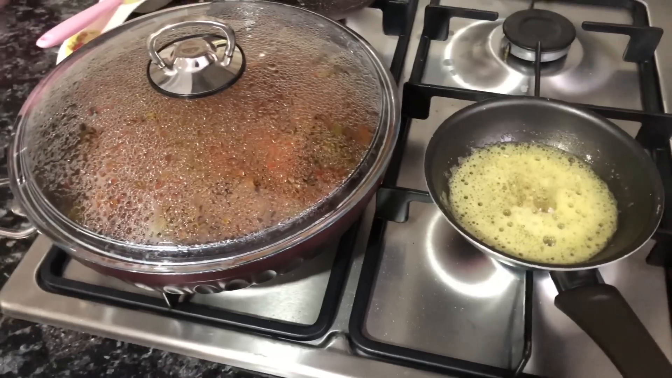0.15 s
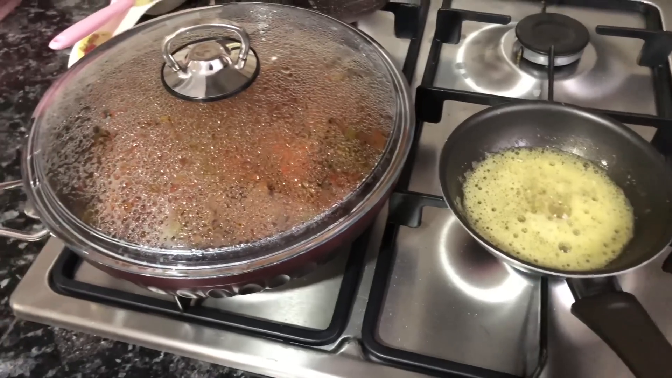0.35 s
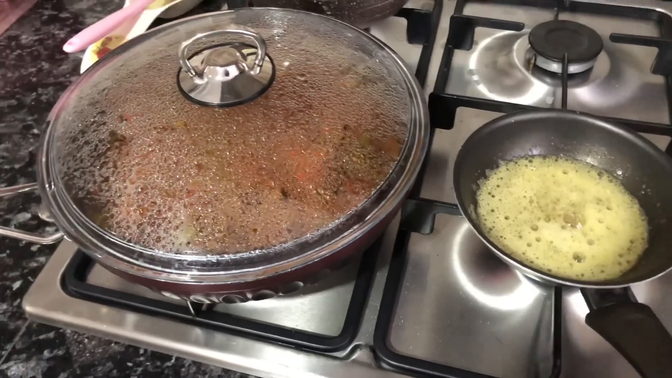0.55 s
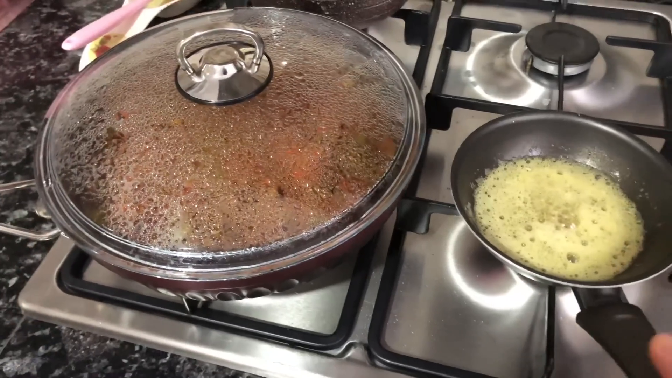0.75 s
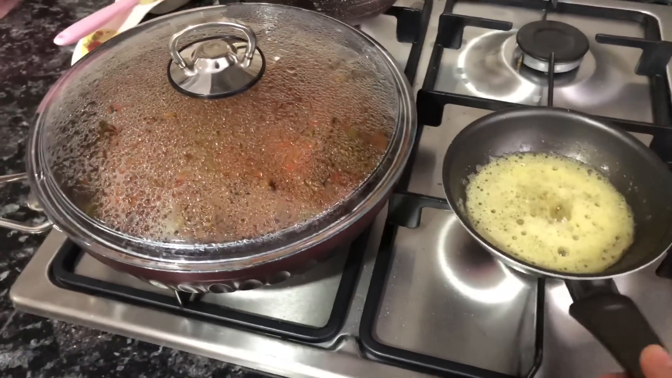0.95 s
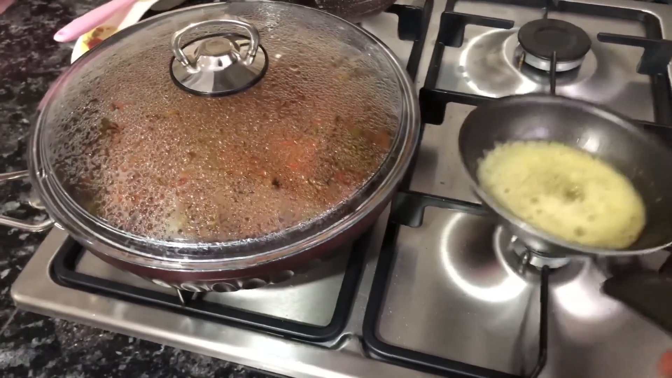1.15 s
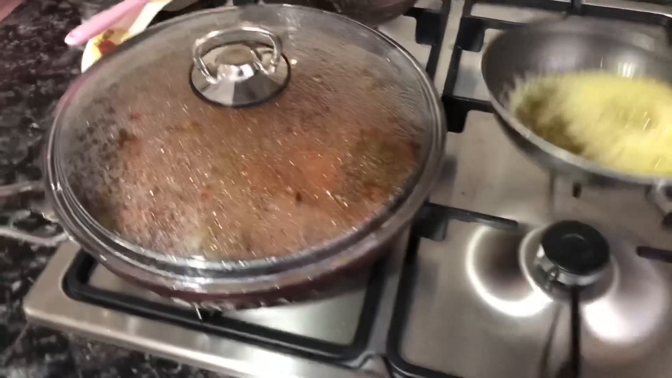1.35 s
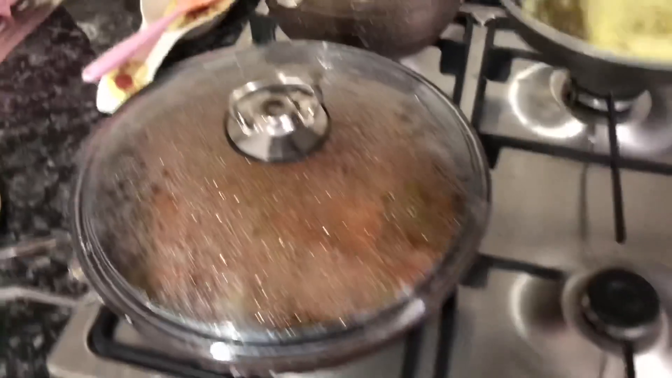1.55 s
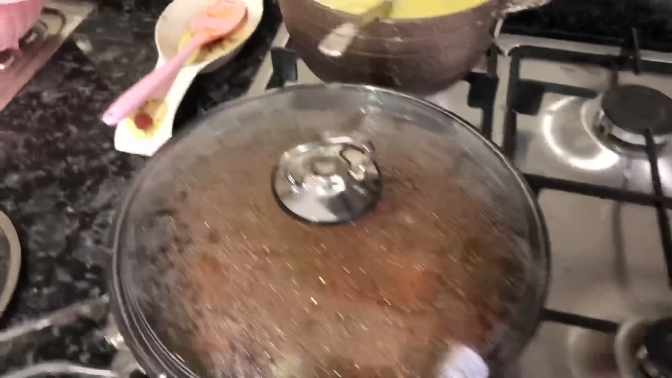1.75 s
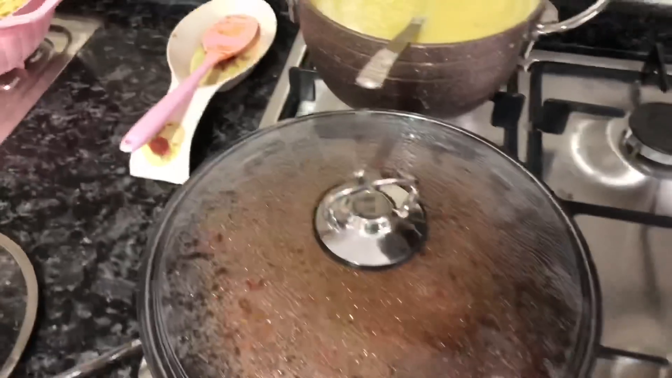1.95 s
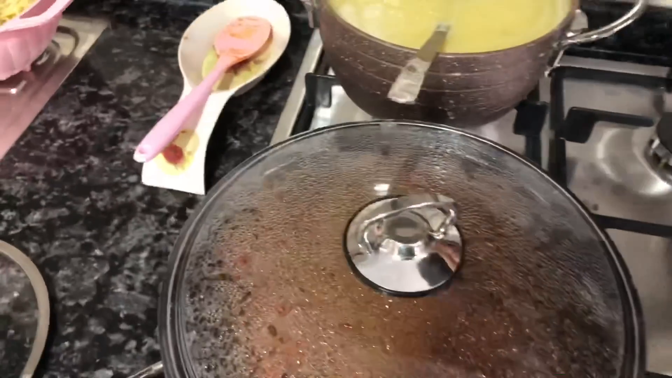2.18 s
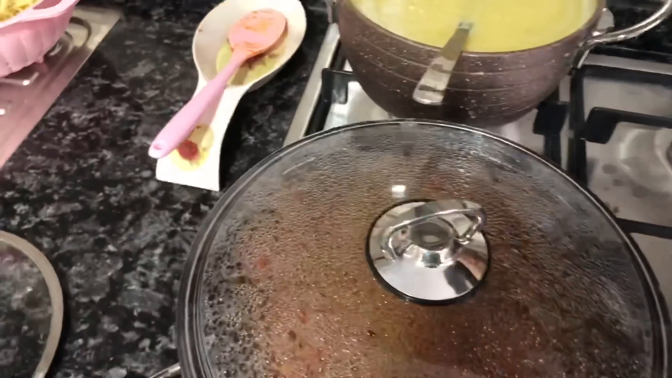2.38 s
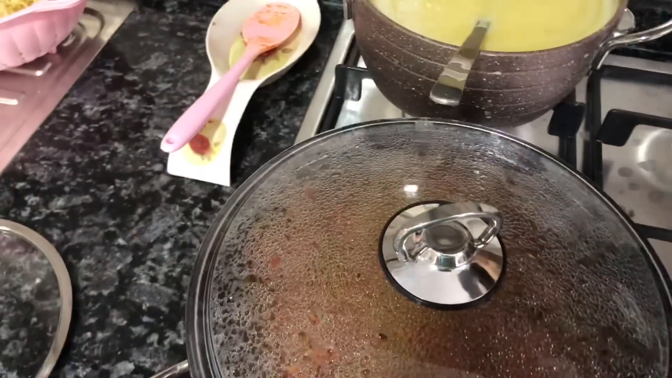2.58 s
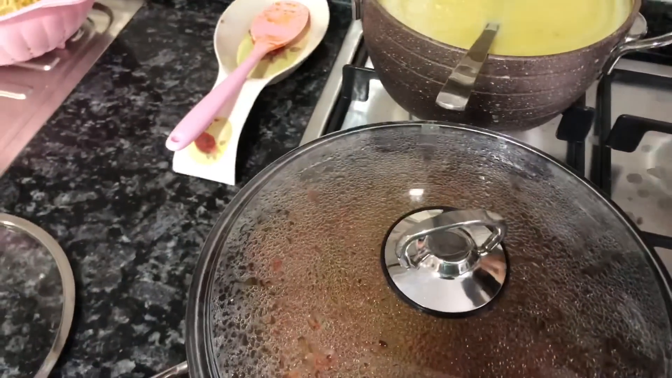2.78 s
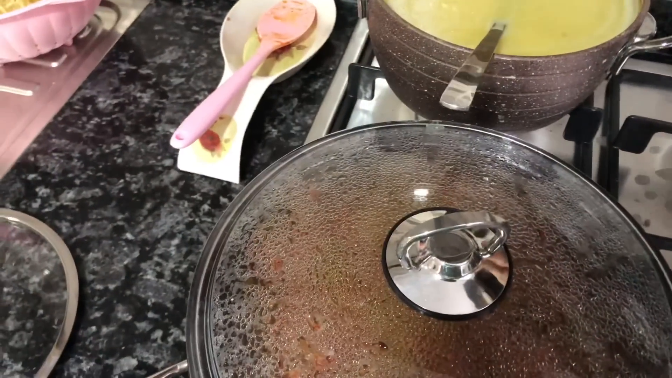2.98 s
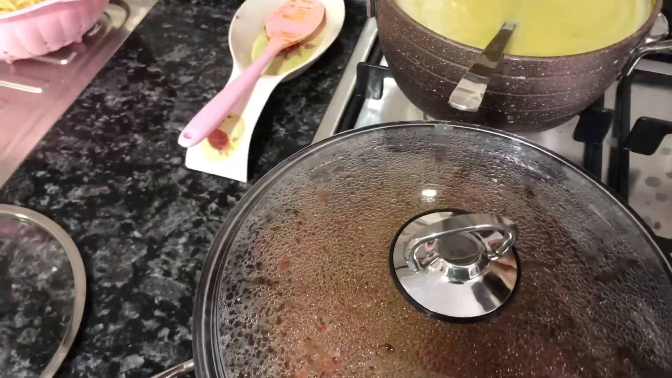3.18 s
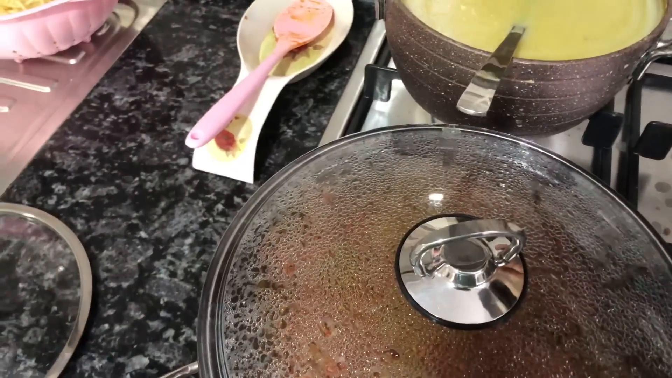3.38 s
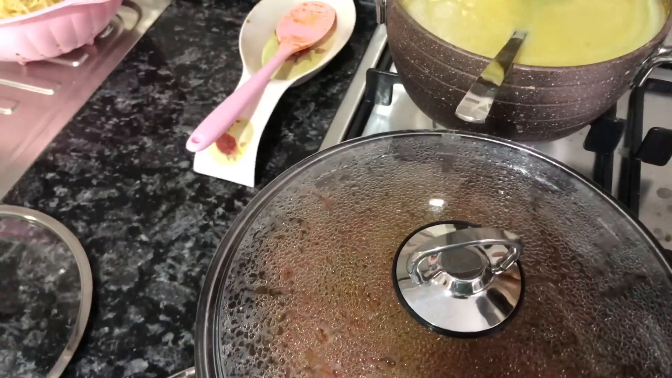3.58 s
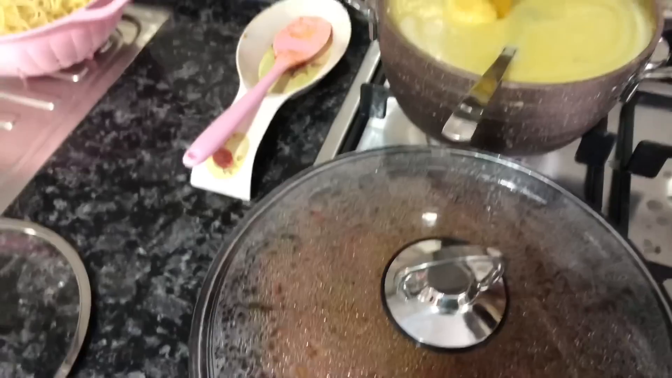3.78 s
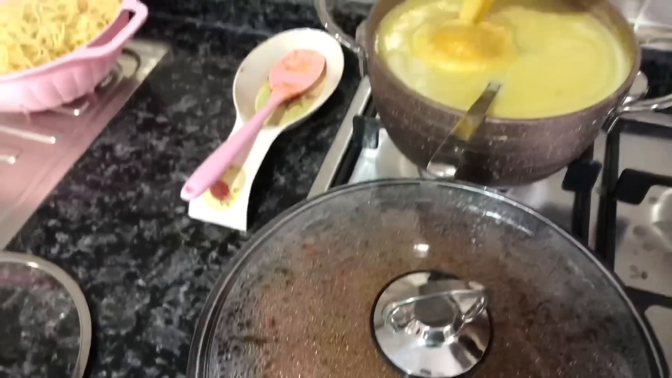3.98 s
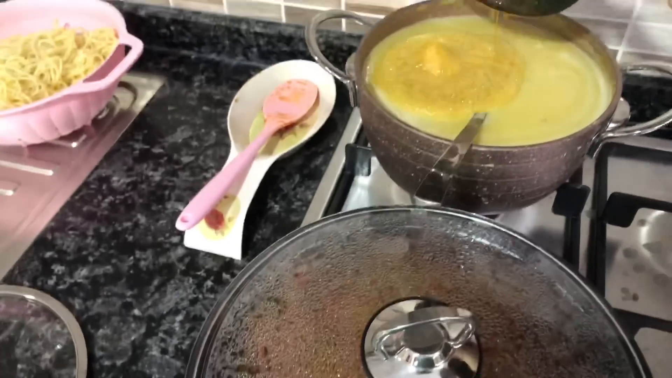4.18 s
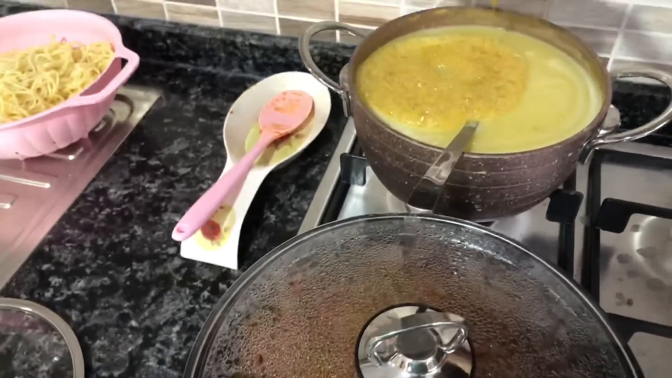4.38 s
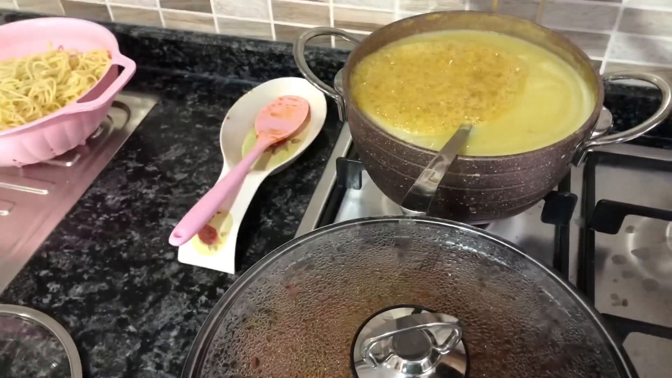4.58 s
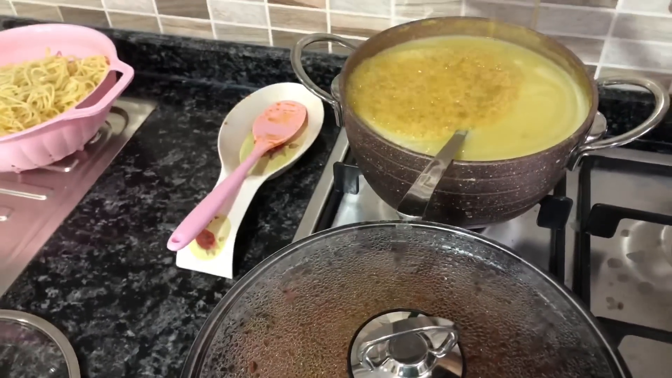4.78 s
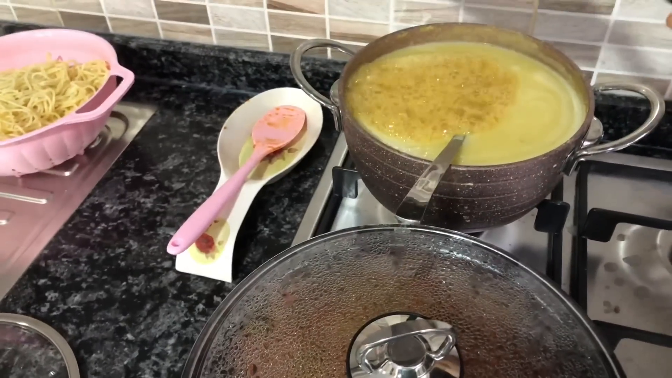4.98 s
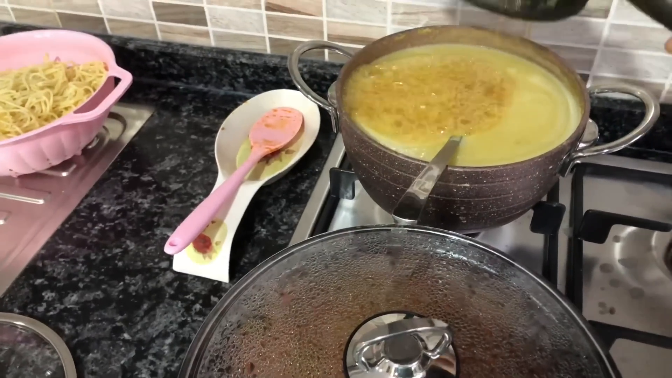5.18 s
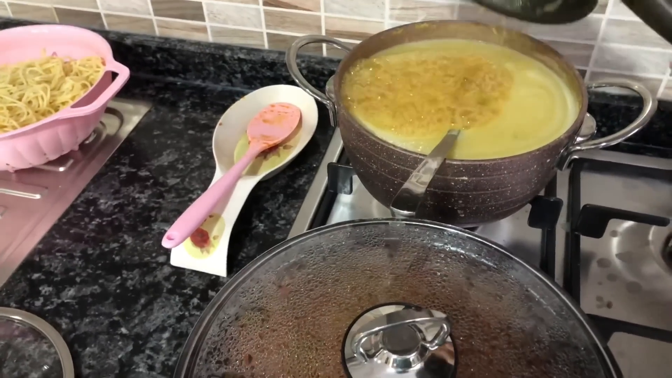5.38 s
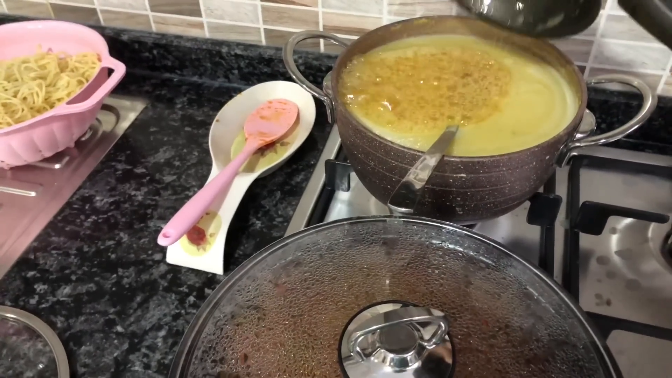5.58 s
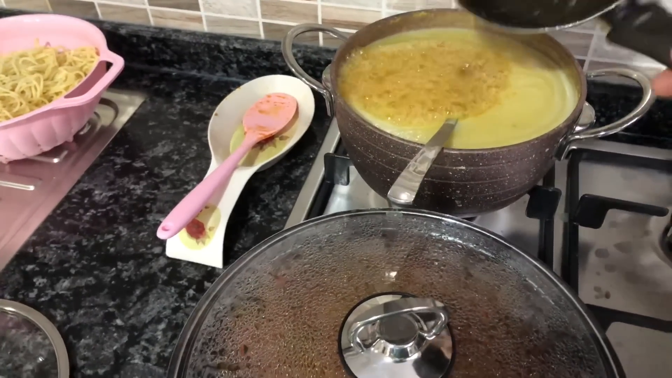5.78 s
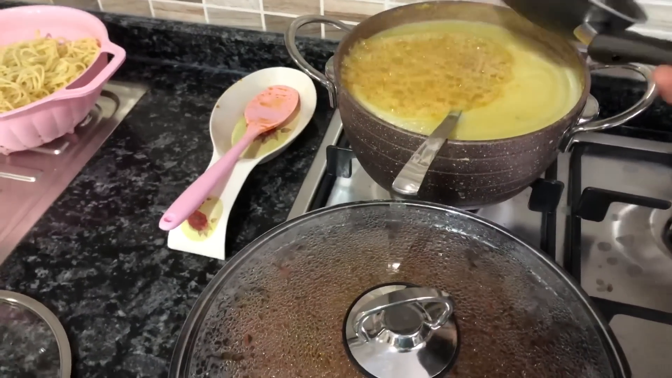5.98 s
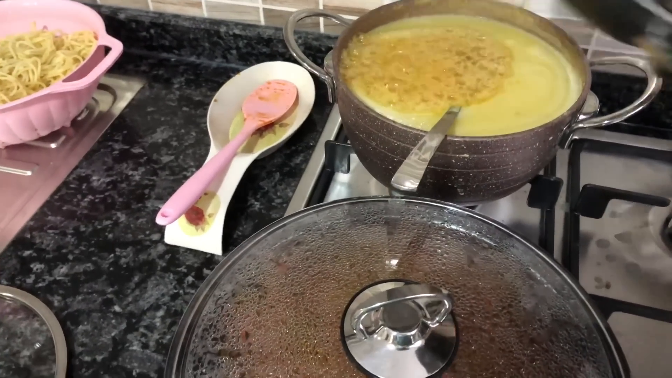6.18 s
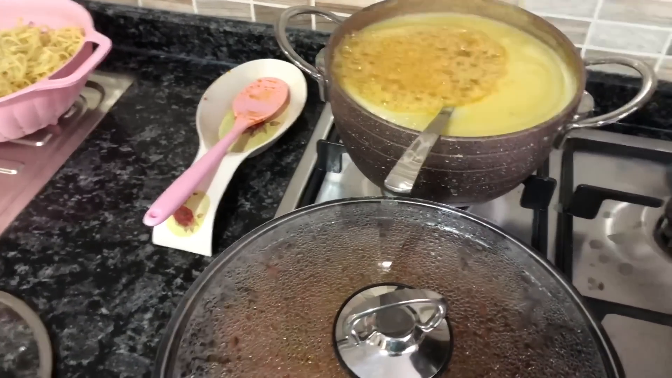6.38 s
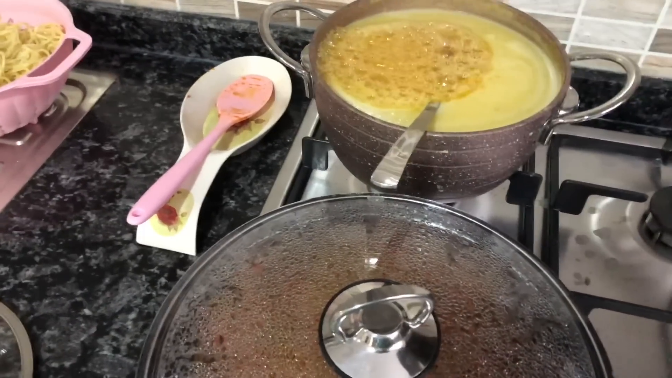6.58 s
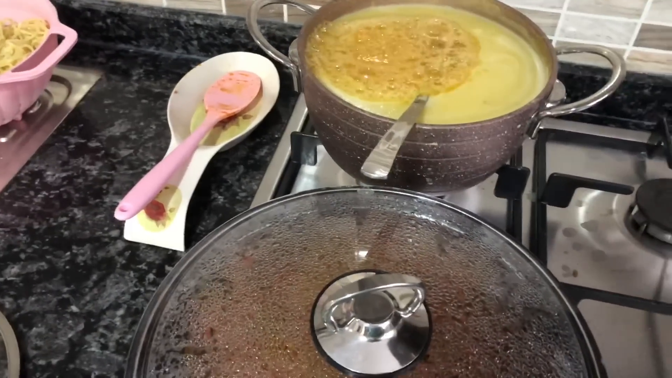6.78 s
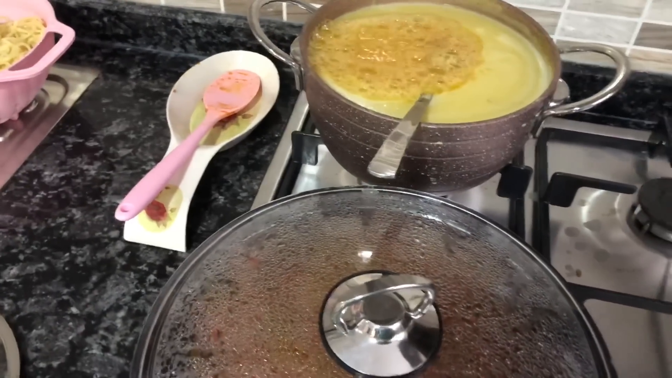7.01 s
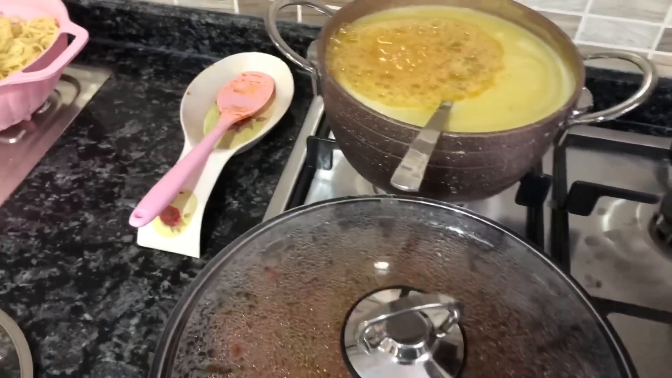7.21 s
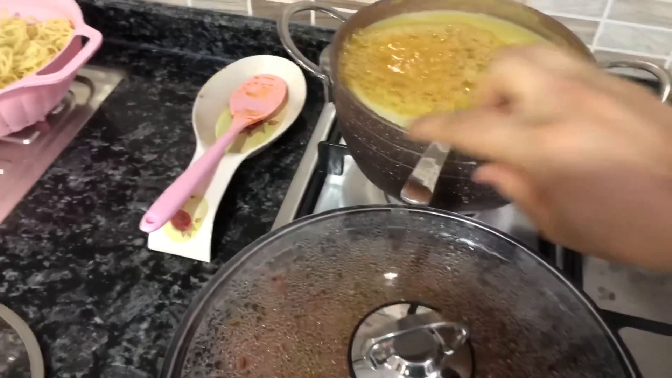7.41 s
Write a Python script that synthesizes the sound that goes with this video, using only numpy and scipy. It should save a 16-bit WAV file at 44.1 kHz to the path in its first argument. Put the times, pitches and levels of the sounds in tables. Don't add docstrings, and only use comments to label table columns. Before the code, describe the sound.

Close recording at a home stove: quiet motor hum, rumble and soft rustling under isolated bubbly pops. A pan drags and knocks on cast iron. Seconds later, hot fat poured into soup bursts into a violent bright sizzle, harsh and clipped, then breaks into wet snapping pops. The empty pan lands with a short ringing clang, rocks slightly, and a few pops linger.

```python
import sys
import numpy as np
from scipy import signal
from scipy.fft import rfft, irfft, next_fast_len
from scipy.io import wavfile

SR = 44100
rng = np.random.default_rng(int(sys.argv[2]) if len(sys.argv) > 2 else 0)


def inscribe(sig):
    pcm = np.round(np.clip(np.atleast_2d(sig).T, -1, 1) * 32767)
    wavfile.write(sys.argv[1], SR, pcm.astype(np.int16))


def invert_db(x):
    u = np.asarray(x, float) / 20
    return 10 ** u


N = 328545
TIME_S = np.arange(N) / SR

# start_s, level_db
BOIL_VIGOUR = [
    (3.4, -43),
    (3.55, -39),
    (3.64, -25.5),
    (3.88, -10.5),
    (4.12, -7.5),
    (4.45, -12),
    (5.4, -31),
    (6, -41),
    (7.45, -54.5),
]
# pitch_hz, level_db, t60_s
KNOCKED_SUPPORT = [(1000, -5, 0.24), (1180, -4, 0.22), (1360, -7, 0.24), (1806, -7, 0.054),
                   (2280, 10, 0.023), (3800, -3, 0.041), (5600, -5, 0.045)]
BUMP_S = .7135


def rms_one(x):
    return x / np.sqrt(np.mean(x ** 2) + 1e-20)


def curve(rows):
    return np.interp(TIME_S, *np.transpose(rows))


def filtered(x, order, hz, kind):
    return signal.sosfilt(signal.butter(order, hz, kind, fs=SR, output="sos"), x)


def drift(rate):
    r = np.exp(-80 * np.pi * rate / SR)
    slow = signal.lfilter([1], [1, -2 * r, r * r], rng.standard_normal(N // 40 + 2002))[2000:]
    return np.interp(np.arange(N) / 40, np.arange(len(slow)), rms_one(slow))


def ring(clicks, hz, t60):
    r = invert_db(-60 / (t60 * SR))
    w = 2 * np.pi * min(hz, 18000) / SR
    return signal.lfilter([0, np.sin(w)], [1, -2 * r * np.cos(w), r * r], clicks + 1e-18)


def colour(x, spectrum):
    size = next_fast_len(N)
    hz, db = np.transpose(spectrum)
    bins_hz = np.arange(size // 2 + 1) * SR / size
    gain = invert_db(np.interp(np.log(bins_hz + 1), np.log(hz), db, -90, -90))
    return rms_one(irfft(rfft(x, size) * gain, size)[:N])


def decay_noise(t60, seconds):
    t = np.arange(int(seconds * SR)) / SR
    puff = rng.standard_normal(len(t)) * invert_db(-60 * t / t60)
    return puff / np.sqrt(np.sum(puff ** 2))


def crackle(per_s, spread_db, pitches_hz, cycles):
    sizes = invert_db(spread_db * np.minimum(rng.exponential(1, N), 4)) * rng.choice([-1, 1], N)
    born = rng.random(N) < per_s * invert_db(2.2 * drift(9)) / SR
    dealt = rng.integers(0, len(pitches_hz), N)
    rings = sum(ring(sizes * born * (dealt == k), hz, cycles / hz) for k, hz in enumerate(pitches_hz))
    return rms_one(rings / np.sqrt(per_s))


def room_tone():
    # start_s, level_db
    movement = [(0, -50.5), (1.3, -54.5), (1.4, -46.5), (1.55, -50), (1.77, -48), (1.9, -52.5),
                (3.2, -54.5), (3.45, -49)]
    # start_s, level_db
    low_swell = [(0.0, -47.5), (4.79, -45), (7.45, -43.5)]
    # pitch_hz, level_db, waver_db
    overtones = [(50.5, -8.5, 7), (66, 0.5, 1), (97.4, -4, 2.5), (135.4, -10, 2.5), (184, -8, 2.5),
                 (232, -11, 0.5)]
    # pitch_hz, level_db per Hz
    rumble_spectrum = [(35, -36), (45, -5), (80, -16), (150, -13), (300, -12), (400, -17.5), (600, -32)]
    rustle_spectrum = [(210, -25), (350, 1.5), (1420, -4.5), (1820, -7.5), (2000, -6.5), (3030, -11.5),
                       (3500, -12), (4550, -11), (7700, -120)]
    foam_spectrum = [(1470, -11), (2500, -8.5), (5770, 8.5), (9980, 2), (12200, 2), (15100, 1), (16200, -8)]
    rustle_db = curve(movement)
    foam_db = -55.5 + .6 * (rustle_db - rustle_db.mean())
    white = rng.standard_normal((3, N))
    hum = 0
    for hz, db, waver in overtones:
        phase = 2 * np.pi * hz * TIME_S + 0.57 * waver * drift(6.9)
        hum = hum + invert_db(db + waver * drift(8.9)) * np.sin(phase)
    low = invert_db(curve(low_swell)) * (invert_db(-4.5) * colour(white[0], rumble_spectrum) + hum)
    foam = white[1] + .8 * crackle(150, 3, np.geomspace(2500, 14000, 8), 6)
    patches = invert_db(2.5 * drift(4))
    rustle = invert_db(rustle_db + 1.25 * drift(2.8)) * colour(white[2], rustle_spectrum)
    return low + invert_db(foam_db) * patches * colour(foam, foam_spectrum) + rustle


def thumps():
    # start_s, pitch_hz, level_db, t60_s
    blows = [
        (.56, 55, -34, .3),
        (.73, 58, -30, .3),
        (.722, 255, -15, .14),
        (.89, 52, -38, .25),
        (6.485, 160, -24, .25),
        (6.74, 150, -29, .3),
    ]
    low = 0
    for s, hz, db, t60 in blows:
        since = TIME_S - s
        swell = invert_db(db - 60 * np.abs(since) / t60) * np.clip(since / .015, 0, 1)
        low = low + swell * np.sin(2 * np.pi * hz * since)
    knock = (np.arange(N) == round(BUMP_S * SR)) * invert_db(-18)
    return low + sum(invert_db(db) * ring(knock, hz, t60 * .3) for hz, db, t60 in KNOCKED_SUPPORT)


def stroke(start, attack, hold, peak_db, release_db):
    t = TIME_S - start
    late = np.maximum(t - attack - hold, 0)
    fall = invert_db(-release_db * late) + invert_db(-17 - 160 * late)
    return invert_db(peak_db) * np.clip(t / attack, 0, 1) ** 2 * fall


def scuffs():
    # start_s, attack_s, hold_s, peak_db, release_db_per_s
    rubs = [
        (.515, .03, .01, -49, 500),
        (.724, .006, .012, -34, 600),
        (.853, .006, .018, -48, 900),
    ]
    grit = rng.standard_normal(N) * (rng.random(N) < 9000 / SR)
    bright = rms_one(filtered(grit, 2, [2500, 15500], "band"))
    return sum(stroke(*row) for row in rubs) * bright


def rubbing(strokes, modes, damping, grit_db, soft_hz):
    catches = rng.standard_normal(N) * (rng.random(N) < 2500 / SR)
    catches = filtered(catches, 2, soft_hz, "low")
    body = rms_one(sum(invert_db(db) * ring(catches, hz, t60 * damping) for hz, db, t60 in modes))
    grit = rms_one(filtered(catches, 2, [350, 2500], "band"))
    return sum(stroke(*row) for row in strokes) * (body + invert_db(grit_db) * grit)


def pan_on_support():
    # pitch_hz, level_db, t60_s
    grating = [(157, -14, 0.24), (329, 1.5, 0.12), (548, -6, 0.048), (856, -7, 0.019), (1280, -19, 0.03)]
    dragged = [(343, -19, 2), (547, 2, 0.53), (662, 4, 0.27), (1320, -2, 0.44), (2160, -20, 0.16),
               (3120, -10, 0.13), (3790, -14, 0.28)]
    # start s, attack s, hold s, peak dB, release dB per s
    nudge, shift = (0.0, .05, .025, -32, 600), (7.33, .09, .04, -27.5, 500)
    drag, settle = (.508, .014, .05, -29, 330), (6.712, .01, .002, -29, 450)
    thud, bump = (.722, .015, .01, -18.5, 400), (BUMP_S, .001, .015, -24, 350)
    tilt, swing = (1.02, .008, .015, -48, 400), (1.42, .006, .02, -47, 400)
    metal = rubbing([nudge, shift], grating, 0.9, -22, 1500)
    metal = metal + rubbing([drag, settle], dragged, 0.11, -14, 2300)
    metal = metal + rubbing([thud], grating, 0.43, -23, 3000)
    metal = metal + rubbing([bump], KNOCKED_SUPPORT, 0.23, -1.3, 5000)
    return metal + rubbing([tilt, swing], KNOCKED_SUPPORT, 0.2, -15, 1000)


def clang():
    # start_s, level_db
    contacts = [
        (6.4815, 0),
        (6.536, -26),
        (6.694, -44),
    ]
    # pitch_hz, level_db, t60_s
    pan_modes = [(315, -12.5, 0.1), (525, -20, 0.11), (1120, -12, 0.12), (1486, -17, .3), (1580, -11, 0.32),
                 (1603, 17.5, 0.058), (2317, -15, 0.068), (3088, -19, 0.4), (3120, -5.5, 0.27),
                 (3560, -7, 0.033), (4930, -18, 0.12), (6110, -30, 0.15), (7560, -27, 0.12)]
    clicks = np.zeros(N)
    for s, db in contacts:
        clicks[round(s * SR)] = invert_db(db)
    flutter = invert_db(2 * np.array([drift(60), drift(60), drift(60)]))
    rings = 0
    for k, (hz, db, t60) in enumerate(pan_modes):
        rings = rings + (-1) ** k * invert_db(db) * flutter[k % 3] * ring(clicks, hz, t60)
    crack = signal.fftconvolve(clicks, decay_noise(.028, .08))[:N]
    return rings + invert_db(37) * filtered(crack, 2, [1900, 3000], "band")


def skillet_ring(drops):
    lifted_s, t60_s = .7, .04
    resting = drops * (TIME_S < lifted_s)
    return invert_db(-38) * sum(ring(resting, hz, t60_s) for hz in [1350, 2000, 2600, 3650, 5250])


def drops_table():
    # start_s,
    # cavity_hz, cavity_db, snap_db
    spits_and_drips = [(.0512, 2560, -26.5, -49), (.0583, 2540, -26, -38.5), (.1011, 2300, -23, -24.5),
                       (.1372, 8480, -38, -34), (.2159, 2710, -27.5, -58), (.2238, 2730, -35, -48),
                       (.2893, 2830, -19.5, -24.5), (.3599, 2230, -34, -51), (.4014, 2580, -29, -33),
                       (.4508, 2600, -28, -33), (.4537, 2270, -30, -34.5), (.5449, 3300, -22, -35),
                       (.582, 9000, -40, -33), (.6209, 2870, -29, -52), (.6658, 6680, -47, -30),
                       (.6995, 2280, -23, -43), (.9224, 3230, -38, -41), (.9692, 7460, -18, -26),
                       (1.0714, 4100, -23, -53), (1.1583, 7400, -16.5, -21.5), (1.3658, 1300, -33, -42),
                       (1.4297, 8480, -31, -27.5), (1.454, 4400, -25, -40), (1.5098, 6900, -20, -35),
                       (1.593, 4440, -26, -49), (1.629, 3790, -37, -52), (1.6599, 5500, -31, -49),
                       (1.9152, 4050, -37, -54), (2.0079, 6070, -42, -26), (2.0723, 5650, -20.5, -25),
                       (2.1732, 3300, -14, -32), (2.215, 5160, -17.5, -37), (2.3159, 8200, -27.5, -34),
             (2.4605, 4900, -23.5, -26), (2.5204, 4120, -29.5, -48), (2.5488, 2350, -32, -35),
             (2.6122, 5860, -20, -26), (2.6222, 5120, -16, -18), (2.6957, 5150, -27, -17),
             (2.7476, 7800, -30, -40.5), (2.766, 6680, -20, -29), (2.78, 6200, -21, -28.5),
             (2.8125, 6040, -8.5, -11.5), (2.9864, 3270, -38.5, -46), (3.066, 4220, -39, -33.5),
             (3.1383, 4010, -23.5, -26), (3.207, 4800, -21.5, -28), (3.2118, 4330, -22, -41),
             (3.3039, 3880, -15, -27.5), (3.3567, 4700, -8.5, -33.5), (3.4254, 3500, -3.5, -21),
             (3.4356, 3060, -19, -43), (3.4853, 5210, -14, -46), (3.4952, 3800, -5, -29.5),
             (3.546, 5200, -10, -36), (3.5624, 5170, -16, -23.5), (3.6077, 2650, -12, -20.5),
             (3.6463, 7360, 1, -7.5), (3.7082, 4610, .5, -20)]
    lone_pops = [(5.6916, 6800, -6, -11), (5.7517, 2240, -12, -38), (5.7637, 5560, -8, -30),
                 (5.7887, 4350, -14, -16), (5.827, 4180, -11, -35), (5.8812, 3920, -6, -38),
                 (5.9234, 7670, -17, -28), (5.9977, 4820, -11, -23), (6.0483, 7280, -11, -23),
                 (6.6492, 8480, -19, -26), (6.1293, 6720, -21, -26), (6.1533, 3000, -7, -23),
                 (6.1844, 5600, -11, -38), (6.2009, 6550, -14, -17), (6.2143, 6500, -7, -9),
                 (6.2528, 7280, -16, -8), (6.2721, 3450, -12, -37), (6.3281, 6850, -15, -34),
                 (6.548, 7000, -17, -28), (6.4186, 3960, -25, -34), (6.6937, 1300, -36, -24),
                 (6.7195, 4740, -10, -32), (6.7438, 6290, -20, -25), (6.7721, 6980, -19, -16),
                 (6.8533, 5680, -18, -30), (6.9732, 6590, -10, -11), (7.0134, 4500, -8, -22),
                 (7.1395, 5900, -13, -24), (7.154, 6760, -21, -25), (7.1816, 5730, -16, -38)]
    # start_s, cavity_db, cavity_hz
    loud_bursts = [(4.7028, 0, 4510), (4.7173, 0, 6490), (4.7407, 0, 4840), (4.7617, 1, 4750),
                   (4.7901, 1, 4760), (4.8221, -3, 4800), (4.8295, -2, 6260), (4.846, 0, 4180),
                   (4.8734, 0, 4790), (4.8854, -2, 5730), (4.9233, -2, 4860), (4.9463, -1, 4180),
                   (5.0565, 0, 5940), (5.1099, -3, 4690), (5.1284, -5, 4660), (5.1543, -4, 6160),
                   (5.1653, 0, 4730), (5.2461, -3, 6390), (5.2915, -5, 4660), (5.3369, -4, 5770),
                   (5.3568, -6, 4820), (5.3748, -5, 4780), (5.4057, -6, 5910), (5.4746, -6, 6980),
                   (5.5135, -31, 8500), (5.5135, -6, 5350), (5.5379, -11, 8240), (5.5863, -5, 3550),
                   (5.6292, -10, 4230), (5.6537, -12, 5420)]
    chance = rng.standard_normal((200, 4))
    when = rng.uniform(4.95, 6.2, size=60)
    level_db = 3.5 + .55 * np.interp(when, *np.transpose(BOIL_VIGOUR)) + 2.5 * chance[:len(when), 2]
    pitch_hz = 5800 * np.exp(.22 * chance[:len(when), 3])
    loose = loud_bursts + list(zip(when, level_db, pitch_hz))
    bursts = [(s, hz, db - 2.5, db - 16 + 4 * c) for (s, db, hz), c in zip(loose, chance[:, 0])]
    rows = np.array(spits_and_drips + lone_pops + bursts)
    start_s, hz, cavity_db = rows[:, 0], rows[:, 1], rows[:, 2]
    plop_db = cavity_db - 19.5 - 15 * np.log2(hz / 2500) + 2.0 * chance[:len(rows), 1]
    plop_db += 17 * (start_s > BOIL_VIGOUR[1][0])
    plop_db += 4.5 * np.maximum(start_s - 5.8, 0)
    return np.c_[rows, plop_db]


def pops(events, tear_t60, snap_t60):
    echo_t60_s, echo_db = 0.03, -5
    out, t = np.zeros(N + 4000), np.arange(600) / SR
    noises = rng.standard_normal((len(events), 600))
    for (s, hz, cavity_db, snap_db, plop_db), noise in zip(events, noises):
        tear = noise * invert_db(-60 * t / tear_t60) * np.tanh(t / 0.00037)
        cavity = ring(tear, hz, 7 / hz) + 2.2 * filtered(tear, 4, [2000, 8000], "band")
        snap = filtered(noise * invert_db(-60 * t / snap_t60), 3, 8500, "high")
        gulp = noise * invert_db(-60 * t / 0.011) * np.tanh(t / 0.002)
        plop = filtered(gulp, 3, [720, 2300], "band")
        parts = (cavity, cavity_db + 2.2), (snap, snap_db + 4.5), (plop, plop_db - 1.5)
        pop = sum(invert_db(db) * part / np.abs(part).max() for part, db in parts)
        walls = signal.fftconvolve(pop, decay_noise(echo_t60_s, .06))
        at = round(s * SR)
        out[at:at + 600] += pop
        out[at + 40:at + 40 + len(walls)] += invert_db(echo_db) * walls
    return filtered(out[:N], 6, [700, 16000], "band")


def sizzle():
    # pitch_hz, level_db per Hz
    fizz_spectrum = [(1290, -57), (2200, -2), (2890, -7), (3130, 1.5), (3400, .5), (4760, 4), (6820, 3),
                     (9000, -5), (11700, -65), (19800, -120)]
    spray_spectrum = [(4710, 7), (8000, -1), (8950, -1.5), (15100, 1), (15900, -19), (16200, -118)]
    gurgle_spectrum = [(53, -55), (90, -28), (235, -18), (335, -8), (449, -42), (822, -1.5), (1190, -8),
                       (1350, 0.5), (2400, -4), (3120, 0), (5280, -120)]
    pour_starts_s, pour_swell_s, pour_ends_s, pour_fade_s = 3.64, .1, 4.1, .2
    fizz_db = curve(BOIL_VIGOUR)
    pouring = np.clip((pour_ends_s - TIME_S) / pour_fade_s + 1, 0, 1)
    early = np.clip((pour_starts_s - TIME_S) / pour_swell_s, 0, 1)
    spray_db = -16 + .77 * fizz_db + 4.5 * pouring - 9 * early
    gurgle_db = -6 + 1.05 * fizz_db + 3.5 * pouring
    steam = invert_db(.08 * (fizz_db - fizz_db.max()))
    per_s = 300 + 5000 * invert_db(fizz_db)
    begun = np.clip((TIME_S - 3.4) / .1, 0, 1)
    gust = invert_db(0.35 * drift(10.3) + 1.66 * drift(55)) * begun
    fizz = crackle(per_s, 2.5, np.geomspace(2300, 8500, 14), 8.3)
    fizz = colour(fizz + 1.05 * steam * rng.standard_normal(N), fizz_spectrum)
    spray = crackle(per_s, 3.7, np.geomspace(8500, 16000, 6), 12.0)
    spray = colour(spray + 1.8 * steam * rng.standard_normal(N), spray_spectrum)
    gurgle = crackle(per_s * .3, 2.0, np.geomspace(800, 2300, 10), 18.5)
    gurgle = rms_one(gurgle + 2.7 * colour(rng.standard_normal(N), gurgle_spectrum))
    mix = invert_db(fizz_db + 2.1) * fizz + invert_db(spray_db + 7.15) * spray + invert_db(gurgle_db + 0.24) * gurgle
    return gust * mix


def kitchen(x):
    t60_s, level_db, wall_cut_hz = 0.28, -10, 4800
    dull = np.exp(-2 * np.pi * wall_cut_hz / SR)
    tail = signal.lfilter([1 - dull], [1, -dull], decay_noise(t60_s, 0.82))
    return invert_db(level_db) * signal.fftconvolve(x, np.r_[np.zeros(200), tail])[:N]


def scene():
    drops = pops(drops_table(), tear_t60=0.0075, snap_t60=0.0065)
    metal = pan_on_support() + thumps() + scuffs() + skillet_ring(drops)
    near = drops + metal + clang()
    return (near + kitchen(near) + sizzle() + room_tone())[None]


def top_cut(x):
    return signal.sosfilt(signal.butter(12, 16780, fs=SR, output="sos"), x)


def record(dry):
    overload = .93
    clipped = np.clip(dry, -overload, overload)
    mix = filtered(clipped, 3, 40, "high")
    return top_cut(mix)


dry = scene()
out = record(dry)
inscribe(out)
```